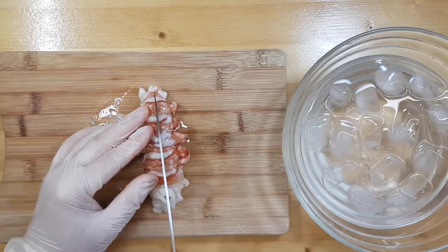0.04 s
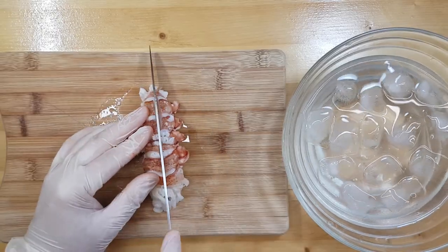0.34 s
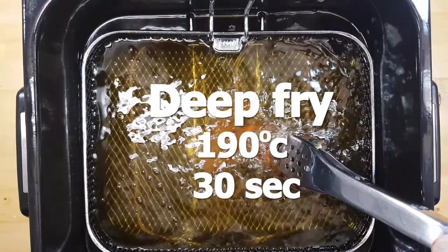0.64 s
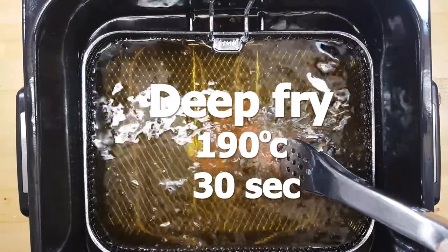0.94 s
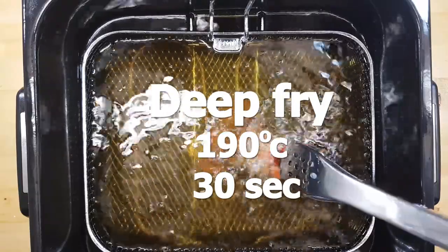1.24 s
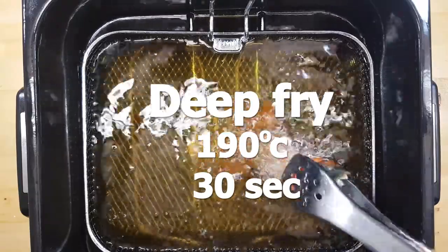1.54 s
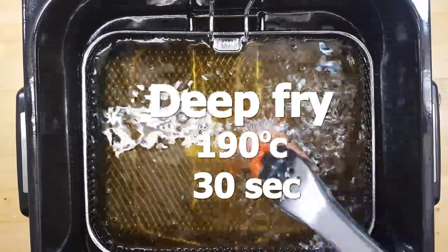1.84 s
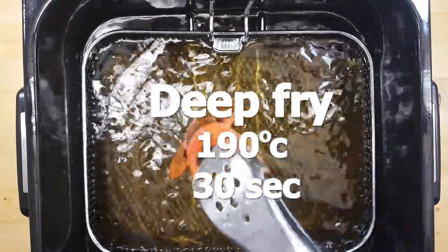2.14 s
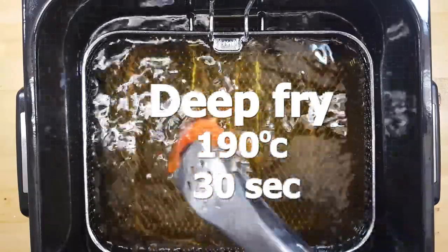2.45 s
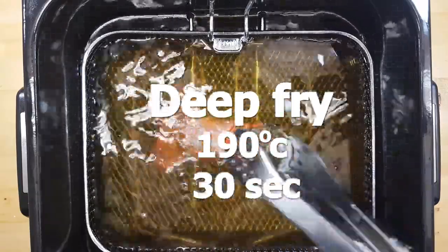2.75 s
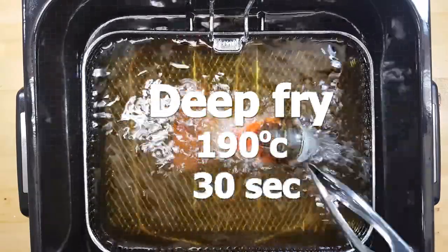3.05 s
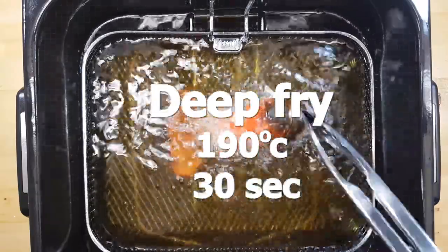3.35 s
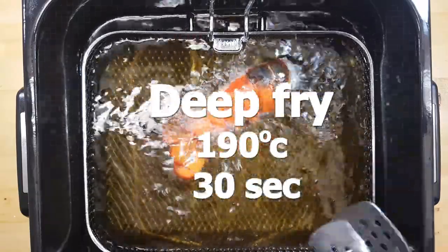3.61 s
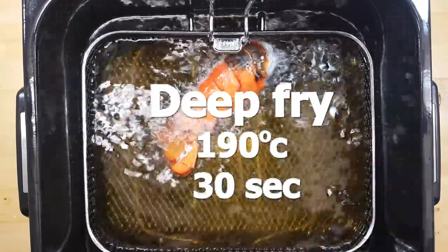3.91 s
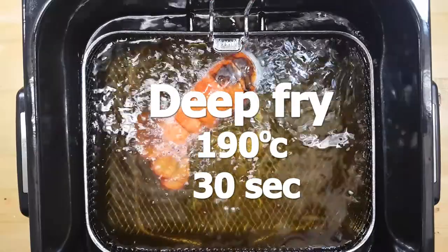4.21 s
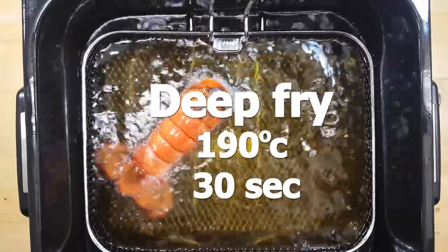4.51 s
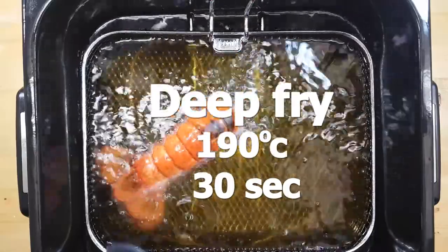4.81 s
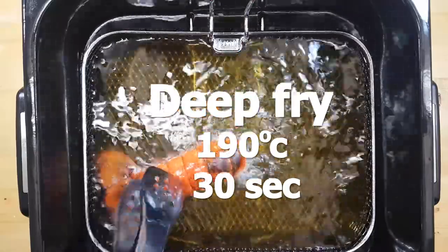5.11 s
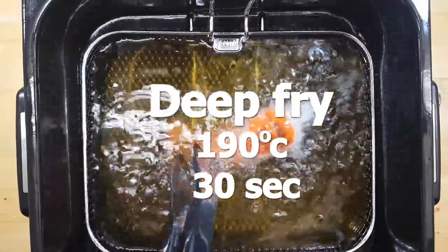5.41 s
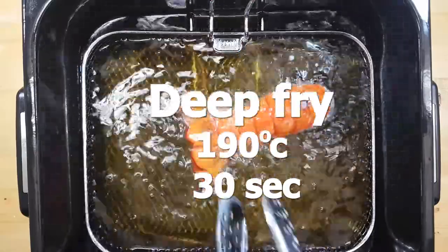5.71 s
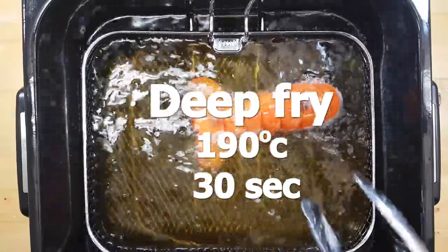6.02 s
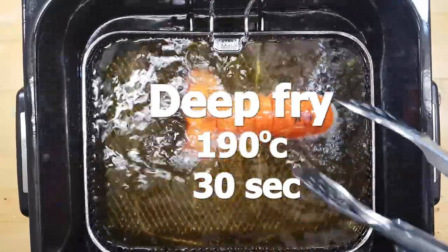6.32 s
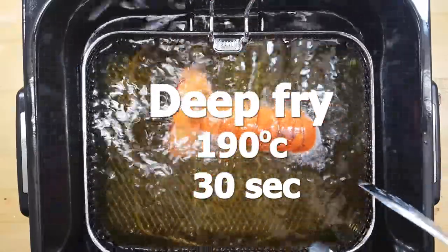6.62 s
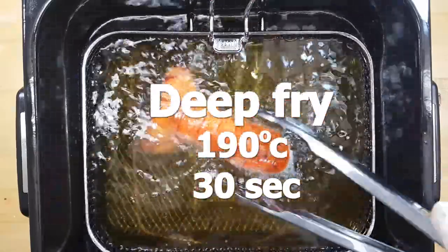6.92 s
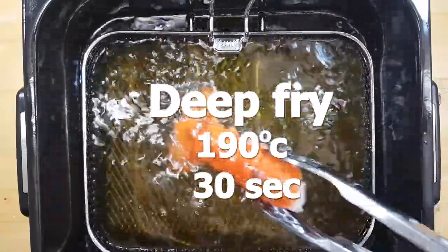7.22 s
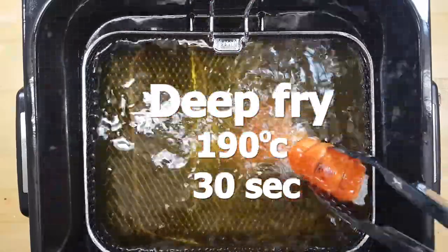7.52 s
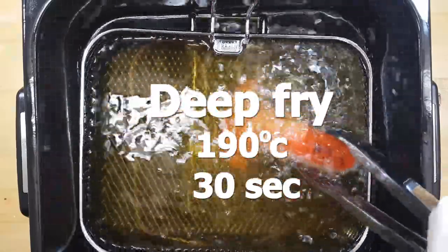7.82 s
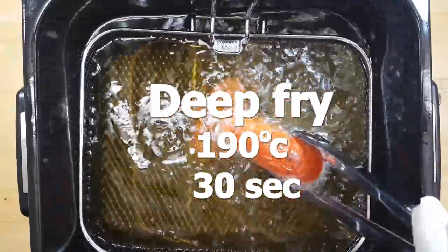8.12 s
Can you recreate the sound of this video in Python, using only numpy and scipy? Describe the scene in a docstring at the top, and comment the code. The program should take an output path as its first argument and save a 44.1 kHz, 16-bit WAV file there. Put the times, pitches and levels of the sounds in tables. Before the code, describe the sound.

Hot oil sizzles and bubbles in a deep fryer, with small crackles, plops and soft sloshes as tongs turn the food.

```python
"""Lobster tail in a deep fryer

Tongs turn the tail in hot oil, close under a stereo microphone. Steam boils out as a dense fizz
and short spitting jets; larger bubbles gurgle and plop at the surface, and water drops crack.
The oil well rings and scatters it all, and a fan hums in the small kitchen."""
import sys
import numpy as np
from scipy import signal
from scipy.fft import rfft, irfft, next_fast_len
from scipy.io import wavfile

SR = 44100
rng = np.random.default_rng(int(sys.argv[2]) if len(sys.argv) > 2 else 0)


def transcribe(u):
    """Save the signal u as a 16-bit wav file named by the first command-line argument.

    u: samples, shape (n,) or (channels, n), limited to [-1, 1]; the rate is SR.
    q: integer samples, one column per channel.
    """
    v = np.clip(np.atleast_2d(u).T, -1, 1)
    q = np.round(v * 32767).astype(np.int16)
    wavfile.write(sys.argv[1], SR, q)


N = 368235
TIME_S = np.arange(N) / SR

# Steam leaving the shell as the tail is turned. Each row: time in seconds, fizz level in dB.
STEAM_LEVEL = [(.7, -38.5), (1.1, -37.5), (1.55, -35), (1.8, -31), (2.05, -30.5), (2.45, -31), (2.58, -38),
               (2.66, -31.5), (2.78, -33.5), (3.0, -34.5), (3.12, -31.5), (3.45, -29), (3.75, -31.5),
               (4.3, -29.5), (5.1, -32), (5.27, -31), (5.45, -29.5), (6.8, -29.5), (8.35, -28.5)]
# Brightness of the fizz. Each row: time in seconds, top-octave gain in dB.
TREBLE_GAIN = [(.7, 6.5), (1.8, 3.5), (2.0, 3.5), (2.2, 1), (2.55, 1.5), (3.2, 3), (3.8, 5), (4.6, 3),
               (6.2, 1.5), (8.35, -1)]
# How hard the oil bubbles. Each row: time in seconds, gurgle level in dB.
GURGLE_LEVEL = [(.7, -43), (0.88, -41), (1.25, -43.5), (1.5, -40), (1.76, -35.5), (1.87, -33.5),
                (1.98, -39), (2.15, -38.5), (2.35, -42.5), (2.8, -41.5), (2.95, -36), (3.39, -35),
                (3.65, -34), (3.92, -35.5), (3.98, -31), (4.25, -34), (4.54, -34), (5.01, -37.5),
                (5.2, -36.5), (6.07, -34.5), (6.65, -38), (6.95, -36.5), (7.3, -39.5), (7.55, -32),
                (7.9, -37.5), (8.34, -33.5)]
# Lesser plops, most while the tail floats free. Each row: time in seconds, dB relative to the gurgle.
SMALL_PLOP_LEVEL = [(.7, -19), (3.0, -15), (3.6, -8), (4.2, -9.5), (5.7, -13), (6.4, -16), (8.35, -16)]
# Stirring by the tongs. Each row: time in seconds, relative churn level in dB.
STIR_LEVEL = [(.7, -50.5), (1.95, -54.5), (2.1, -44), (3.3, -40.5), (8.35, -38)]
# Kitchen fan. Each row: time in seconds, blade hum level in dB, relative draught level in dB.
FAN_LEVEL = [(.7, -61, -67), (1.9, -60, -68), (2.2, -47.5, -52), (8.35, -46, -50)]
# Thin squeak of steam. Each row: time in seconds, pitch in Hz, level in dB.
SQUEAK_PATH = [(.70, 1700, -90), (.711, 1680, -38), (.735, 1600, -39), (.755, 1620, -43), (.768, 1920, -41),
               (.785, 2050, -42), (.805, 2300, -50), (.82, 2350, -120)]

# Clearly ringing bubbles. Each row: start in seconds, level in dB, pitch in Hz, decay in cycles.
PING_EVENTS = [(.806, -24, 3380, 9.6), (1.187, -19.5, 5600, 21), (1.459, -24, 5600, 24),
               (2.726, -18.5, 6000, 14), (5.372, -12.5, 2960, 6.8), (5.69, -19, 5100, 25),
               (8.06, -12, 3060, 5.8)]
# Steam jets. Each row: start in seconds, relative level in dB, pitch in Hz, decay in seconds.
JET_EVENTS = [(.81, -40.5, 3870, 0.1), (.95, -34, 3200, 0.009), (1.075, -30, 5500, 0.0049),
              (1.128, -37, 2000, 0.013), (1.13, -35.5, 870, 0.011), (1.345, -36, 12900, .022),
              (1.425, -31.5, 3060, 0.015), (1.585, -30, 4570, 0.036), (1.684, -33, 5050, .012),
              (1.762, -31, 5500, 0.016), (1.88, -34.5, 2860, 0.032), (1.945, -41, 14000, .03),
              (2.02, -38, 13500, .05), (2.078, -30, 3220, 0.012), (2.122, -38, 10300, .014),
              (2.255, -29, 3500, 0.034), (2.355, -32, 3040, 0.012), (2.47, -31, 4400, 0.026),
              (2.62, -38, 2020, 0.051), (2.635, -35, 5000, 0.039), (2.8, -31.5, 7040, 0.011),
              (2.872, -35.5, 3130, 0.037), (2.935, -39, 2060, 0.035), (2.968, -38, 14000, 0.011),
              (3.09, -36, 3300, 0.033), (3.092, -38, 8900, .018), (3.365, -29, 4600, 0.02),
              (3.445, -32, 5700, 0.053), (3.672, -33, 13800, .012), (4.0, -30, 900, 0.02),
              (4.06, -36, 9300, .04), (4.652, -27, 6300, 0.0096), (4.8, -22, 5840, 0.0047),
              (4.834, -24, 1610, 0.047), (5.04, -28, 5600, 0.021), (5.097, -33, 5300, 0.081),
              (5.148, -28, 6550, 0.012), (5.696, -34, 9600, .011), (6.684, -35, 10200, .014),
              (6.821, -37, 9900, .014), (6.95, -31, 5900, .007), (7.282, -33, 7000, .006),
              (7.405, -29, 7000, 0.0073), (7.575, -31.5, 3080, 0.056), (7.996, -30, 8200, .014)]
# Spattering oil. Each row: start in seconds, relative level in dB.
TICK_EVENTS = [(1.0741, -32), (1.2686, -16), (2.0025, -19), (2.8007, -22), (3.9416, -20), (4.8011, -23),
               (5.096, -18), (5.5075, -25), (6.2305, -28), (7.0131, -27), (7.4057, -24), (7.5199, -20),
               (7.5978, -20)]
# Exploding water drops. Each row: start in seconds, relative level in dB.
CRACK_EVENTS = [(1.2686, -3.5), (1.7787, -2.5), (3.4775, -9.5), (3.984, -4.5), (4.7325, -13),
                (5.6935, -4.5), (5.6997, -15), (7.1175, -9.5), (8.0605, -21)]
# Large bubbles. Each row: start in seconds, relative level in dB, pitch in Hz, thump in dB re the note.
PLOP_EVENTS = [(1.538, -21, 1030, -40), (1.624, -19, 1040, -46), (1.846, -16.5, 1100, -55),
               (1.887, -17, 1140, -45), (2.417, -18, 770, -21), (3.165, -15.5, 815, -20.5),
               (3.274, -15, 900, -13.5), (3.4725, -8, 1160, -29), (3.491, -13.5, 1060, -33),
               (3.61, -19, 1250, -29), (3.625, -17, 1080, -33), (3.632, -9, 1120, -43),
               (3.637, -14, 1100, -35), (3.675, -12, 1120, -40), (3.687, -9, 1110, -41),
               (3.692, -17, 1100, -37), (3.783, -15.5, 1080, -29), (3.817, -19, 1070, -28),
               (3.848, -13.5, 1150, -31), (3.901, -21.5, 695, -5), (3.906, -16, 980, -19),
               (3.931, -12, 1140, -35), (3.9415, -17, 1200, -35), (3.953, -8.5, 1100, -42),
               (3.9635, -12, 1410, -30), (3.984, -17, 1350, -18), (4.008, -21, 920, -13),
               (4.059, -16, 990, -16), (4.075, -14.5, 980, -36), (4.151, -9, 1160, -17),
               (4.215, -19, 910, -23), (4.304, -21, 1320, -35), (4.358, -13, 930, -25),
               (4.362, -7.5, 1030, -22), (4.58, -18, 1370, -24), (4.597, -16, 1350, -33),
               (4.7325, -8.5, 1180, -28), (4.836, -9, 1220, -20), (4.8795, -10.5, 1020, -21),
               (4.94, -17, 1300, -28), (4.973, -7.5, 1230, -26), (5.139, -16, 1340, -27),
               (5.31, -12.5, 1080, -24), (5.359, -18, 1030, -30), (5.476, -11.5, 950, -21),
               (5.489, -12, 1320, -30), (5.625, -6.5, 1120, -32), (5.642, -19, 930, -25),
               (5.688, -10, 1090, -24), (5.699, -9, 1070, -26), (6.17, -20, 990, -30),
               (6.1758, -7, 1260, -34), (6.2305, -7.5, 860, -15.5), (6.835, -11, 1430, -38),
               (6.853, -17, 1120, -35), (7.093, -15, 1240, -23), (7.117, -13.5, 850, -51),
               (7.1495, -19.5, 1190, -35)]
# Pushes of the tongs. Each row: start in seconds, level in dB, pitch in Hz, decay in seconds.
SLOSH_EVENTS = [(2.14, -34.5, 930, 0.03), (2.375, -37, 2040, 0.058), (2.454, -31, 1960, .028),
                (5.325, -34, 2120, .04), (5.375, -30, 3050, 0.038), (5.42, -34, 2050, .04),
                (6.252, -29, 2100, 0.022), (7.115, -27.5, 2110, 0.041), (7.118, -30.5, 750, 0.024),
                (7.455, -25.5, 1650, 0.027), (7.48, -32, 540, 0.022), (7.688, -30, 840, 0.033),
                (7.712, -32, 2080, .035), (7.81, -30.5, 740, 0.035), (8.105, -32, 1400, .055)]

# Source spectra. Each row: frequency in Hz, gain in dB.
FIZZ_SPECTRUM = [(400, -33), (900, -4.5), (1500, 1.5), (2200, 3), (2550, -1), (3300, 2), (3550, 2),
                 (4300, 1), (6000, 3.5), (6350, -2), (7100, 1), (7700, -2.5), (11000, -6), (16000, -10)]
GURGLE_SPECTRUM = [(250, -39), (480, -23.5), (680, -8.5), (900, -2.5), (1080, 0), (1500, -1.5),
                   (2200, -0.5), (2600, -6.5), (5000, -31.5)]
CHURN_SPECTRUM = [(30, -61), (80, -1.5), (150, 0), (280, 6), (420, 7), (700, 5), (2000, -26)]
DRAUGHT_SPECTRUM = [(20, -17), (80, -4.5), (130, -4.5), (250, -7), (1000, -39)]
TICK_SPECTRUM = [(1000, -35), (3000, -8), (6000, 13), (9000, -2), (16000, -9)]
# Oil well resonances. Each row: frequency in Hz, width in Hz, gain over the direct sound in dB.
WELL_MODES = [(240.5, 12, 3.5), (515.5, 35, 3.5), (587, 12.4, 6.5), (690.4, 14, 4), (746, 10, 1),
              (830, 30, -6), (905, 25, 5), (1056, 29, 2), (1120, 50, -6), (1290, 42, -8), (1520, 34, -3.5),
              (1690, 9.8, -1), (1810, 14, -5), (1906, 31, 1.5), (2034, 19.6, 9), (2254, 110, -1.5),
              (2850, 15, 8), (3080, 25, -2), (3218, 84, 2), (3750, 20, -11), (4204, 28, 3),
              (5060, 110, -10), (5700, 260, -14.5), (5970, 130, 2), (6830, 220, -14.5), (7800, 95, -8)]
# Cancellations by wall echoes. Each row: frequency in Hz, width in Hz, centre gain in dB.
WALL_NOTCHES = [(424, 82, 0), (1180, 62, -7), (2450, 190, -1.5), (3572, 400, -7.5), (5470, 230, -5.5),
                (6030, 270, -6.5), (7750, 180, -5.5)]
# Likeness of the two microphones. Each row: frequency in Hz, coherence from 0 to 1.
MIC_COHERENCE = [(100, .93), (300, .95), (800, .985), (1300, .92), (1700, .5), (2000, .7), (2600, .4),
                 (3200, .5), (4200, .2), (12000, .05)]
# Balance of the microphones. Each row: frequency in Hz, left minus right in dB.
MIC_BALANCE = [(200, .5), (500, 0), (900, 0), (1450, 2.5), (1850, -2.5), (2050, 1.5), (2650, -2), (3200, 3),
               (4000, 1), (5100, 5.5), (5800, 3), (10000, 2.5), (13000, 4.5), (15000, 8.5)]


def undb(db):
    """Decibels to gain."""
    return 10 ** (np.asarray(db) / 20)


def unit(x):
    """Scale to rms 1."""
    return x / np.sqrt(np.mean(x ** 2) + 1e-18)


def curves(table):
    """Value columns of a timed table, at every sample."""
    times_s, *columns = np.transpose(table)
    return [np.interp(TIME_S, times_s, column) for column in columns]


def along(points, hz):
    """Read (Hz, value) points on a log-frequency axis."""
    knots_hz, values = np.transpose(points)
    return np.interp(np.log(hz + 1), np.log(knots_hz), values)


def filtered(x, response):
    """Filter by a function of frequency in Hz."""
    size = next_fast_len(x.shape[-1] + SR // 10, True)
    hz = np.arange(size // 2 + 1) * SR / size
    return irfft(rfft(x, size) * response(hz), size)[..., :x.shape[-1]]


def colour(x, spectrum, size=2048):
    """Minimum-phase filter: clicks keep their sharp front."""
    hz = np.arange(size // 2 + 1) * SR / size
    cepstrum = irfft(np.log(undb(along(spectrum, hz))))
    fold = 1 + np.sign(size / 2 - np.arange(size))
    fold[0] = 1
    impulse = irfft(np.exp(rfft(cepstrum * fold)))
    return signal.oaconvolve(x, impulse[None], axes=-1)[:, :N]


def walk(rate_hz):
    """Smooth random drift, rms 1."""
    knots = rng.standard_normal(N // 20)
    return unit(np.interp(TIME_S * rate_hz, np.arange(len(knots)), knots))


def add(track, start_s, sound):
    """Mix a sound into a track."""
    i = int(start_s * SR)
    track[i:i + len(sound)] += sound[:max(N - i, 0)]


def clicks(per_s, spread_db, channels):
    """Random impulses: many small, a few large."""
    shape = (channels, N)
    size = undb(spread_db * np.minimum(rng.exponential(size=shape), 4.8))
    return (rng.random(shape) < per_s / SR) * size * rng.choice([-1, 1], shape)


def burst(samples, decay_s):
    """Exponentially decaying noise."""
    return rng.standard_normal(samples) * np.exp(-TIME_S[:samples] / decay_s)


def ring(hz, cycles, glide):
    """A bubble's note: swells, rises in pitch, dies away."""
    turn = np.arange(int(6 * cycles * SR / hz) + 2) * hz / SR
    phase = 2 * np.pi * turn * (1 + glide * turn / cycles)
    note = np.sin(phase) * turn * np.exp(-2 * turn / cycles)
    return note / np.abs(note).max()


def bubbles(low_hz, high_hz, cycles, spread_db, count, channels):
    """A swarm of ringing bubbles between two pitches."""
    spots = np.zeros((channels, N))
    for k, (when, pitch, size, length) in enumerate(rng.random((count, 4))):
        gain = (-1) ** k * undb(-spread_db * np.log(size + 0.017))
        hz = low_hz * (high_hz / low_hz) ** pitch
        add(spots[k % channels], when * N / SR, gain * ring(hz, cycles * (.5 + length), glide=0.034))
    return spots


def hiss(hz, decay_s, sharpness, sputter=0.035, skirt_db=-9):
    """A puff of steam sputters through a narrow gap that gives it a pitch."""
    t = TIME_S[:int(3 * decay_s * SR)]
    noise, flutter = rng.standard_normal((2, SR // 3 if decay_s > .012 else SR // 25))[:, :len(t)]
    steam = noise * np.exp(sputter * np.repeat(flutter, 40)[:len(t)])
    gap = lambda f: 1 / (1 + 1j * sharpness * (f / hz - hz / (f + 1)))
    envelope = (1 - np.exp(-t / (0.012 * decay_s))) * np.exp(-(t / decay_s) ** 2)
    return unit(filtered(steam, lambda f: gap(f) * (gap(f) + undb(skirt_db)))) * envelope


def scatter(spots, wall_db, room_db, wall_decay_s=0.0069, room_t60_s=0.28):
    """Mid and side of spots on the oil: direct, off the fryer walls and through the kitchen."""
    t = TIME_S[:SR // 6]
    tails = [(wall_db, np.exp(-t / wall_decay_s) * (t > .0005)),
             (room_db, undb(-60 * t / room_t60_s) * (t > .006))]
    mid_side = 0
    for k, spot in enumerate(spots):
        paths = sum(undb(db) * unit(rng.standard_normal((2, len(t))) * tail) for db, tail in tails)
        paths /= np.sqrt(len(t))
        paths[0, 0] += 1  # direct sound
        paths[1, 1 + k] += (-1) ** k  # spots alternate sides
        mid_side += signal.oaconvolve(np.float32(spot[None]), np.float32(paths), axes=-1)[:, :N]
    return mid_side


def patchy(x, rate_hz, depth_db, bands=6):
    """Each bubble size has its own flurries: overlapping bands swell separately."""
    centres_hz = np.geomspace(2500, 14000, bands)
    parts = (filtered(x, lambda hz: np.interp(hz, centres_hz, band)) for band in np.eye(bands))
    return sum(part * undb(depth_db * walk(rate_hz)) for part in parts)


def wake(events, decay_s=0.011):
    """Unrest of the oil, 0-1: jumps at each event, most at the loudest, and settles."""
    top_db = max(db for _, db, *_ in events)
    jumps = [undb((db - top_db) / 2) * (TIME_S >= start_s) * np.exp(-np.abs(TIME_S - start_s) / decay_s)
             for start_s, db, *_ in events]
    return np.max(jumps, axis=0)


def fizz(flurry_db=1.1, wall_db=-2, wall_decay_s=0.0048, room_db=-7, room_decay_s=0.013):
    """Tiny steam bubbles burst in flurries; each lies elsewhere, so its echoes are its own."""
    pops = clicks(per_s=2600, spread_db=3, channels=1)[0] * undb(flurry_db * walk(rate_hz=70))
    linger = lambda s: signal.lfilter([0, 1 / (s * SR)], [1, -np.exp(-1 / (s * SR))], pops ** 2)
    echo_power = undb(wall_db) ** 2 * linger(wall_decay_s) + undb(room_db) ** 2 * linger(room_decay_s)
    direct = pops * rng.choice([-1, 1], (2, N))
    echoes = np.sqrt(echo_power) * rng.standard_normal((2, N))
    return unit(patchy(colour(direct + echoes, FIZZ_SPECTRUM), rate_hz=60, depth_db=2.5))


def spits(low_hz=4500, high_hz=13000, spread_db=3, count=420):
    """Tiny puffs of steam within the fizz, the high ones fainter and shorter."""
    spots = np.zeros((2, N))
    for k, (when, pitch, size, length) in enumerate(rng.random((count, 4))):
        hz = low_hz * (high_hz / low_hz) ** pitch
        decay_s = 0.002 + 0.007 * length * (1 - .6 * pitch)
        gain = undb(-spread_db * np.log(size + 0.11) - 6 * pitch)
        add(spots[k % 2], when * N / SR, gain * hiss(hz, decay_s, sharpness=12))
    return unit(scatter(spots, wall_db=-7, room_db=-11))


def crackle():
    """Pinhead bubbles tick, each ringing briefly at its own pitch."""
    spots = bubbles(low_hz=2500, high_hz=14500, cycles=5.5, spread_db=2.5, count=2200, channels=3)
    return unit(colour(scatter(spots, wall_db=1, room_db=-1.5), FIZZ_SPECTRUM))


def gurgle():
    """Middle-sized bubbles break at the surface."""
    spots = bubbles(low_hz=507, high_hz=2770, cycles=2.2, spread_db=1, count=5000, channels=4)
    return unit(colour(scatter(spots, wall_db=2, room_db=-1.5), GURGLE_SPECTRUM))


def small_plops():
    """Lesser bubbles plop at random."""
    spots = bubbles(low_hz=950, high_hz=1500, cycles=1.7, spread_db=1.1, count=600, channels=2)
    gain = undb(curves(SMALL_PLOP_LEVEL)[0])
    return gain * unit(colour(scatter(spots, wall_db=-14, room_db=-9), GURGLE_SPECTRUM))


def churn():
    """Stirred oil rolls and thuds softly."""
    thuds = clicks(per_s=260, spread_db=2.8, channels=2)
    gain = undb(curves(STIR_LEVEL)[0] - 6)
    return gain * unit(colour(scatter(thuds, wall_db=-1.5, room_db=-6), CHURN_SPECTRUM))


def fan(blade_hz=251.6, motor_hz=156, motor_db=-66.5):
    """Two wavering hum lines and a low draught, mostly on the left microphone."""
    blade_db, draught_db = curves(FAN_LEVEL)
    blade_gain = undb(blade_db + 1.4 * walk(6.2))
    blades = blade_gain * np.sin(2 * np.pi * np.cumsum(blade_hz + 1.273 * walk(12)) / SR)
    motor = undb(motor_db + 2 * walk(2.35)) * np.sin(2 * np.pi * motor_hz * TIME_S)
    draught = unit(colour(rng.standard_normal((2, N)), DRAUGHT_SPECTRUM))
    draught *= undb(draught_db + 2 * walk(6))
    return np.sqrt(2) * (blades + motor) + draught * undb([[2], [-13]])


def squeak(waver=0.0124):
    """Steam forces a gap in the shell; its unsteady note rises as the gap closes."""
    hz, db = curves(SQUEAK_PATH)
    phase = 2 * np.pi * np.cumsum(hz * (1 + waver * walk(500))) / SR
    return np.sqrt(2) * undb(db + 2 * walk(310)) * np.sin(phase)


def pings():
    """Trapped steam bubbles pinch off and ring with a short rising note."""
    spots = np.zeros((2, N))
    for k, (start_s, db, hz, cycles) in enumerate(PING_EVENTS):
        add(spots[k % 2], start_s, undb(db) * ring(hz, cycles, glide=0.011))
    return scatter(spots, wall_db=-8, room_db=-12)


def jets():
    """Steam sputters out of the shell; the narrower the gap, the higher and clearer the hiss."""
    spots = np.zeros((2, N))
    for k, (start_s, db, hz, decay_s) in enumerate(JET_EVENTS):
        jet = hiss(hz, decay_s, sharpness=4.5 * np.sqrt(hz / 4500), sputter=.2)
        add(spots[k % 2], start_s, undb(db) * jet)
    return undb(2) * scatter(spots, wall_db=-7, room_db=-11)


def ticks():
    """Thin films of oil snap in very short, bright bursts."""
    spots = np.zeros((2, N))
    for k, (start_s, db) in enumerate(TICK_EVENTS):
        add(spots[k % 2], start_s, undb(db) * burst(SR // 100, decay_s=0.00036))
    return colour(scatter(spots, wall_db=7, room_db=-9), TICK_SPECTRUM)


def cracks(spray_db=-17):
    """Water drops flash to steam: one sharp pulse and a spray of oil each."""
    spots = np.zeros((2, N))
    for k, (start_s, db) in enumerate(CRACK_EVENTS):
        spray = undb(spray_db) * burst(SR // 20, decay_s=0.0056)
        pulse = signal.unit_impulse(len(spray))
        add(spots[k % 2], start_s, undb(db) * (pulse + spray))
    spectrum_hz_db = [(300, -70), (600, 2), (1000, 17.5), (2000, 16), (3600, 9.5), (5000, 10.5),
                      (8000, -3.5), (16000, -43)]
    return colour(scatter(spots, wall_db=-10, room_db=-22), spectrum_hz_db)


def plops(thump_hz=265, snap_db=-10):
    """Large bubbles open with a damped note, a thump of displaced oil and a snap."""
    spots = np.zeros((4, N))
    for k, (start_s, db, hz, thump_db) in enumerate(PLOP_EVENTS):
        spot = spots[k % 4]
        add(spot, start_s - .0003, undb(db) * ring(hz, cycles=1.31, glide=0.0017))
        add(spot, start_s - .001, undb(db + thump_db) * ring(thump_hz, cycles=1.77, glide=0.16))
        add(spot, start_s, undb(db + snap_db) * burst(SR // 200, decay_s=0.00025))
    return undb(.5) * scatter(spots, wall_db=-11, room_db=-14)


def sloshes(splash_db=-12):
    """Tongs push the tail through the oil: a rough wash with a splash on top."""
    spots = np.zeros((2, N))
    for k, (start_s, db, hz, decay_s) in enumerate(SLOSH_EVENTS):
        wash = hiss(hz, decay_s, sharpness=2.4, sputter=0.43, skirt_db=-10)
        splash = hiss(2 * hz, decay_s, sharpness=1, sputter=0.76)
        add(spots[k % 2], start_s, undb(db) * (wash + undb(splash_db) * splash))
    return scatter(spots, wall_db=-7, room_db=-11)


def oil_well(hz):
    """Response of the well: direct sound plus its resonances, notched by wall echoes."""
    band = lambda f, width_hz: 1j * hz * width_hz / (f * f - hz * hz + 1j * hz * width_hz)
    ringing = sum(undb(db) * band(f, width_hz) for f, width_hz, db in WELL_MODES)
    notches = [1 + (undb(db) - 1) * band(f, width_hz) for f, width_hz, db in WALL_NOTCHES]
    return (1 + ringing) * np.prod(notches, axis=0)


def microphones(mid_side, low_cut_hz=95):
    """Left and right: alike in the bass, unrelated and leaning left in the treble."""
    sign = np.array([[1], [-1]])
    weights = lambda hz: np.sqrt((1 + sign * np.clip(along(MIC_COHERENCE, hz), 0, 1)) / 2)
    mid, side = filtered(mid_side, lambda hz: weights(hz) * hz ** 2 / np.sqrt(hz ** 4 + low_cut_hz ** 4))
    return filtered(mid + sign * side, lambda hz: undb(sign * along(MIC_BALANCE, hz) / 2))


def scene(start_s=.692, surge_hz=14, treble_hz=7500, crack_wake_db=2, plop_wake_db=7):
    """Surging boil in the ringing oil well, over the fan; silent until start_s."""
    fizz_db = curves(STEAM_LEVEL)[0] + .4 * walk(surge_hz) + crack_wake_db * wake(CRACK_EVENTS)
    gurgle_db = curves(GURGLE_LEVEL)[0] + walk(surge_hz)
    sizzle = undb(fizz_db) * (undb(-0.82) * fizz() + undb(-12.5) * spits() + undb(-5.5) * crackle())
    treble = filtered(sizzle, lambda hz: 1 / (1 + (treble_hz / (hz + 1)) ** 6))
    sizzle += (undb(curves(TREBLE_GAIN)[0]) - 1) * treble
    oil = sizzle + jets() + sloshes() + pings() + ticks() + squeak()
    oil += undb(gurgle_db) * (undb(plop_wake_db * wake(PLOP_EVENTS)) * gurgle() + small_plops())
    oil += churn()
    # Plops and cracks open upwards: only half their sound rings the well.
    half_bursts = (plops() + cracks()) / 2
    fryer = filtered(oil + half_bursts, oil_well) + half_bursts
    fade_in = np.clip((TIME_S - start_s) / 0.002, 0, 1)
    return (microphones(fryer) + fan()) * fade_in


def record(dry, top_hz=15950):
    """Soft clipping, then a steep low-pass."""
    return signal.sosfilt(signal.ellip(10, .2, 80, top_hz, fs=SR, output="sos"), np.tanh(dry))


dry = scene()
out = record(dry)
transcribe(out)
```